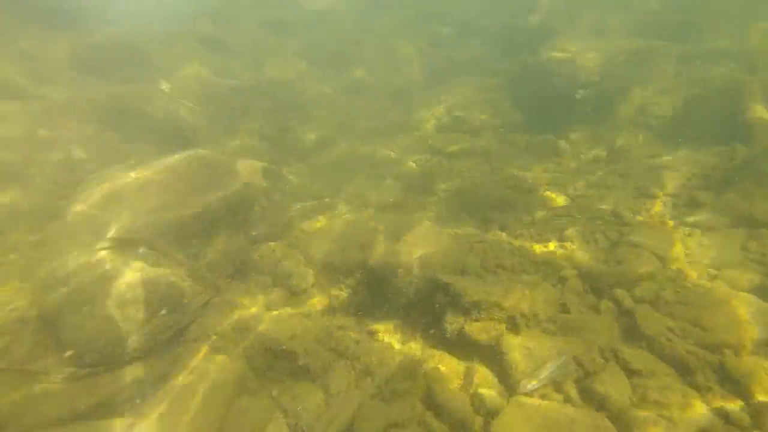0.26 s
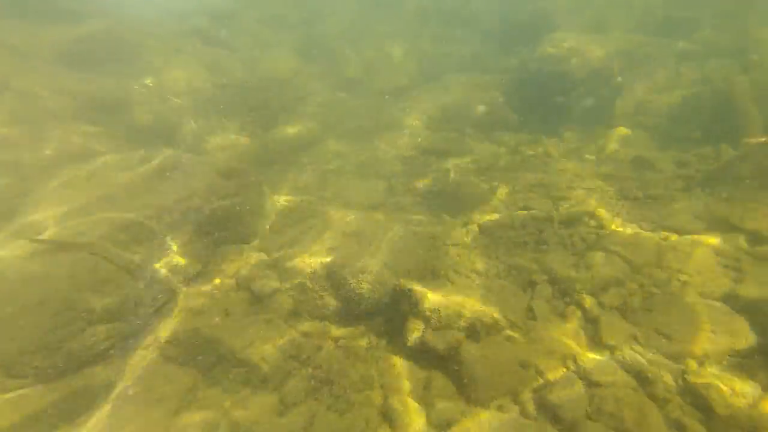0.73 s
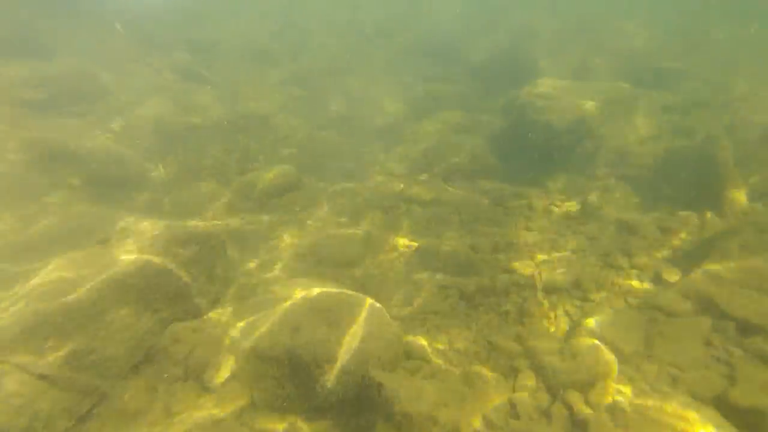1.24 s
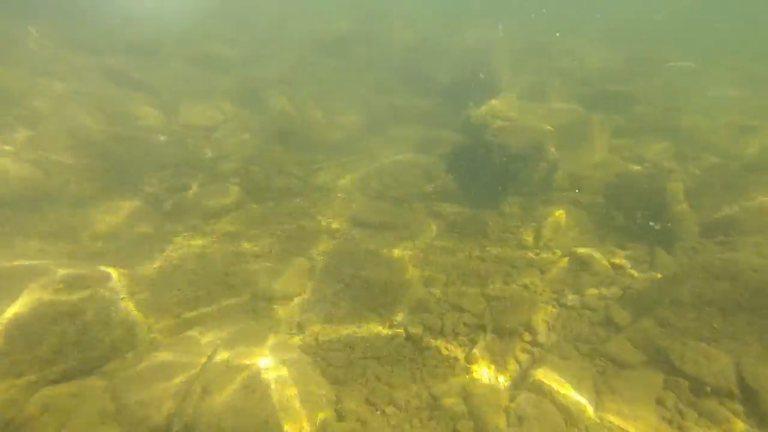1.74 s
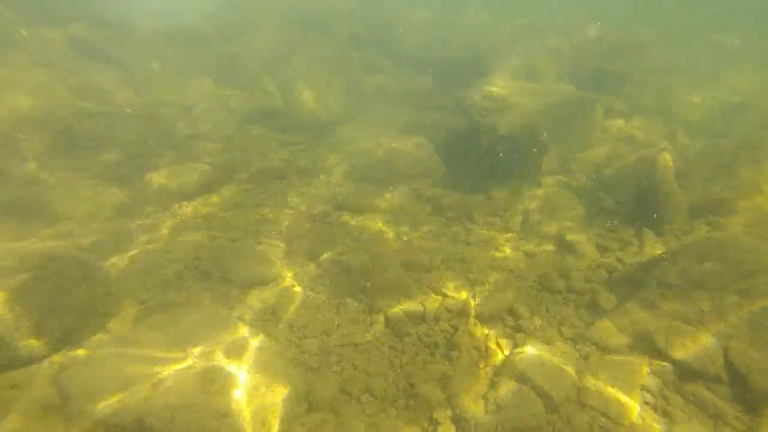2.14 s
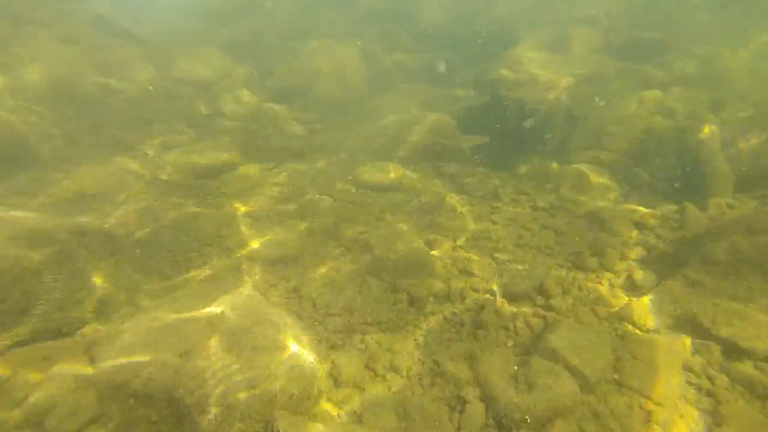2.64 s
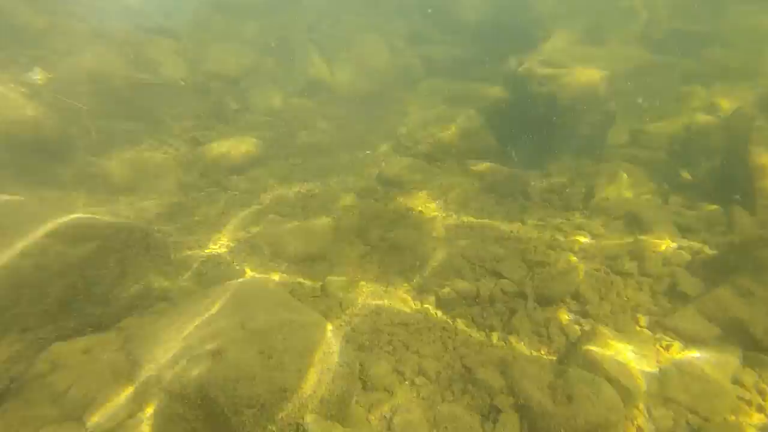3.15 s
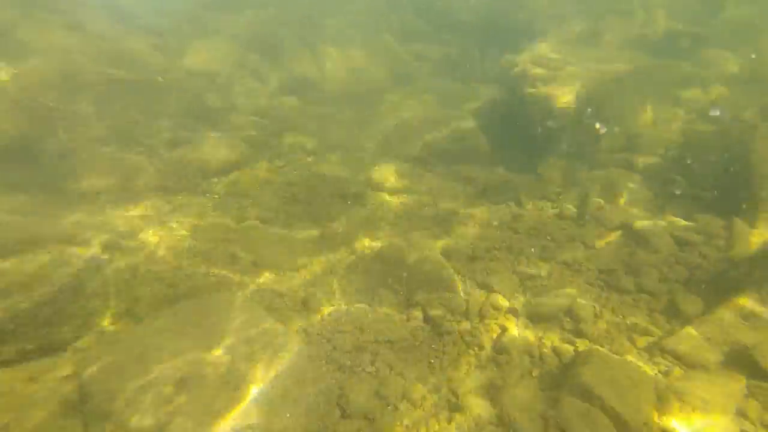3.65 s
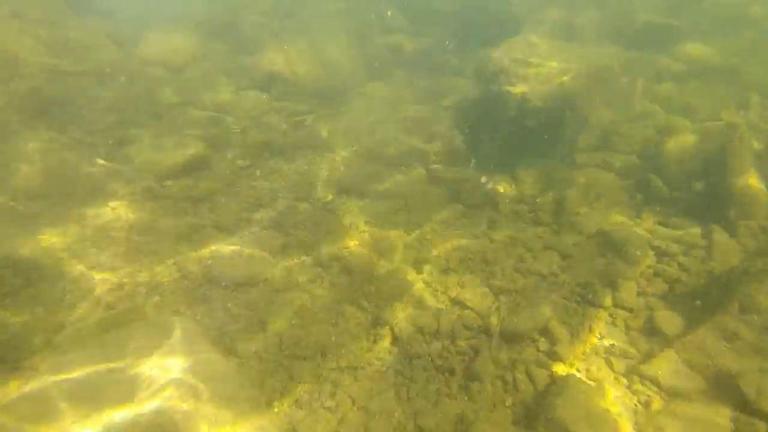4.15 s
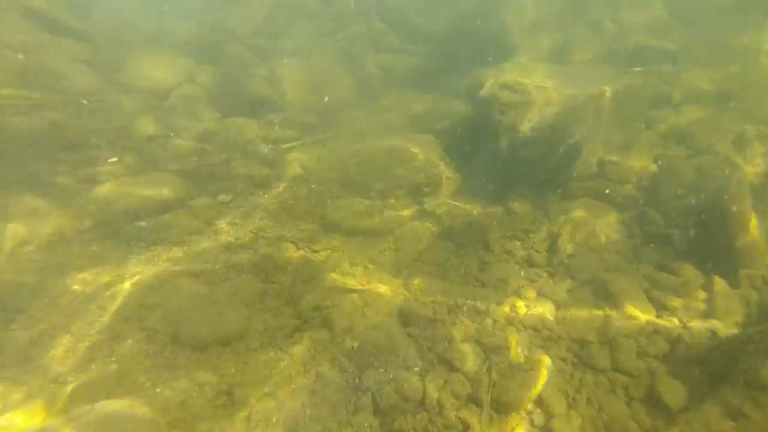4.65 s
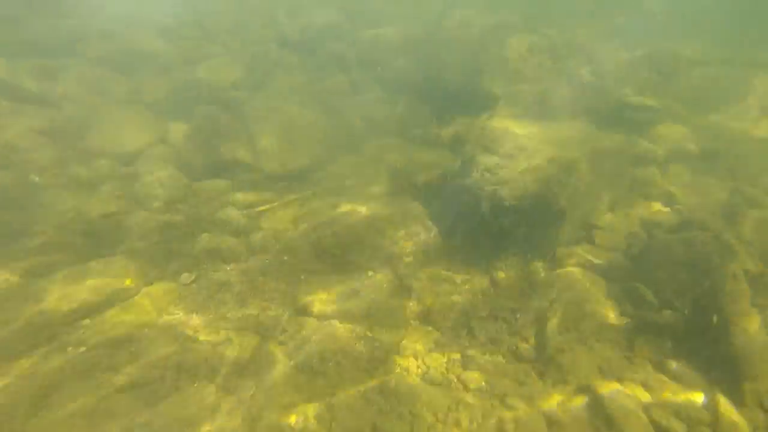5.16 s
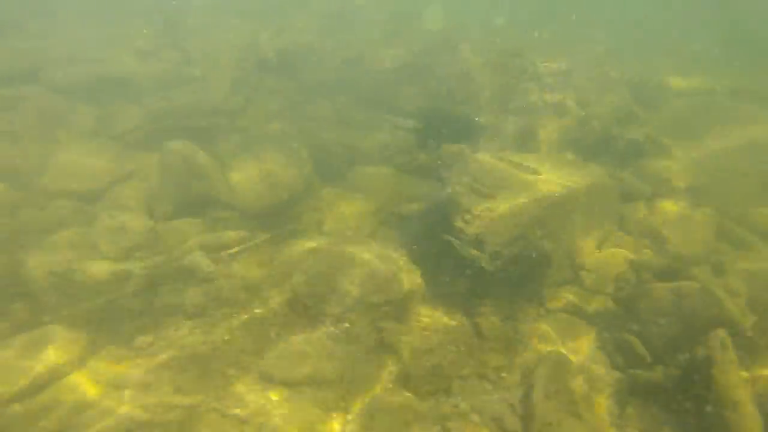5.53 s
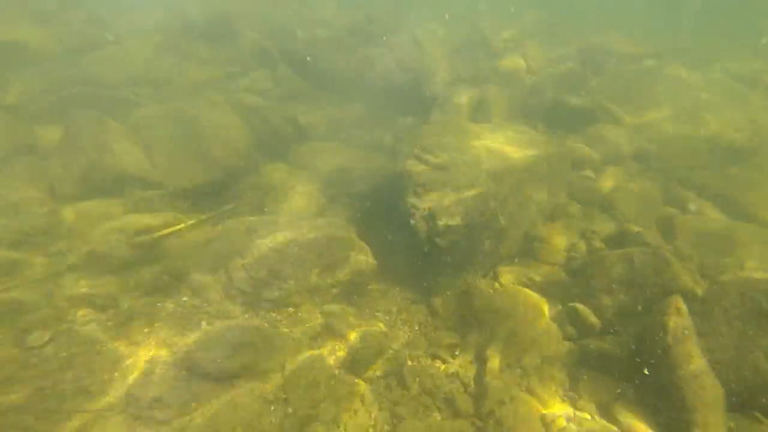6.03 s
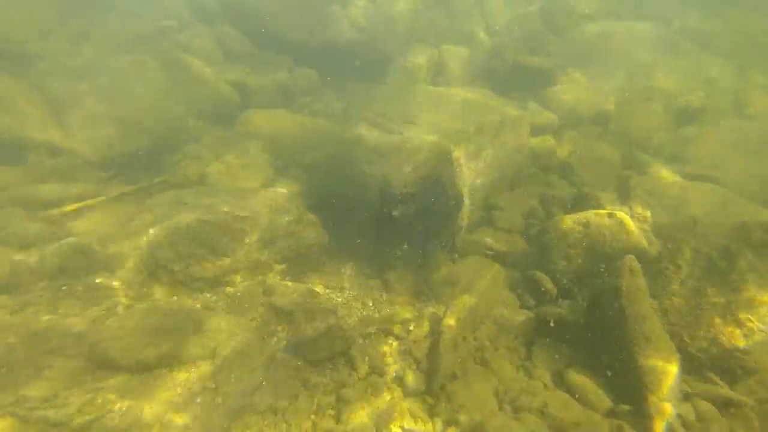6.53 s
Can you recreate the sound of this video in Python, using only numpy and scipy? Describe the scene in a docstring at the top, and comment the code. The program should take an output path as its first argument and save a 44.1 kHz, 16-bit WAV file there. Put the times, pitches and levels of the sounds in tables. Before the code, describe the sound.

Close underwater sound, bass-heavy and dull: eddies buffet a plastic casing, tiny bubbles fizz, weed and sand brush past nearer the left. Stones tap sparsely, then rattle and crack against the casing in a busy cluster. The current falls away, leaving a lone knock and faint juddering ticks, then several heavy bumps close together.

```python
"""On the stony bed of a shallow stream, two microphones inside a small watertight plastic shell pushed along it.
From the start eddies buffet the shell into a low rumble, with bubbles, weed and rubbing grit close against it;
bumps flex it and stones tick on it, one hard knock near 1.6 s, then a crowd of them from about 4 to 5.6 s.
The current falls back near 5.4 s, faint ticks judder past at 6.3 s, and a last surge brings heavy bumps at 6.5 s.
Noise shaped by spectra makes the water, damped modes the contact; left and right agree most in the bass."""
import sys
import numpy as np
from scipy import signal
from scipy.fft import rfft, irfft, next_fast_len
from scipy.io import wavfile
from scipy.ndimage import uniform_filter1d

SR = 44100
rng = np.random.default_rng(int(sys.argv[2]) if len(sys.argv) > 2 else 0)


def bounce(signal):
    """Save signal as a 16-bit WAV file at the path given by the first command-line argument."""
    frames = np.transpose(np.atleast_2d(signal))
    limited = np.clip(frames, -1, 1)
    pcm = np.round(limited * 32767).astype(np.int16)
    wavfile.write(sys.argv[1], SR, pcm)


N = 299439


def undb(db):
    """Amplitude of a level in dB."""
    return 10 ** (np.asarray(db) / 20)


def unit(x):
    """Scale to rms 1."""
    return x / np.sqrt(np.mean(x ** 2))


def smooth_twice(x, size):
    """Two running means along the last axis."""
    return uniform_filter1d(uniform_filter1d(x, size), size)


def walk(rate):
    """Random levels held for 1 / rate s, then smoothed twice; rms 1."""
    hold = int(SR / rate)
    steps = np.repeat(rng.standard_normal(N // hold + 1), hold)
    return unit(smooth_twice(steps, hold)[:N])


def left_right(pan_db):
    """Gains of the two microphones for a left minus right difference in dB."""
    return undb([[pan_db / 2], [-pan_db / 2]])


def pair(a, b, like):
    """Left and right of a given likeness (-1 opposed, 1 the same) from two unrelated signals."""
    like = np.clip(like, -1, 1)
    common = 1 + like + 1e-3
    difference = b * np.sqrt((1 - like) / common)
    return np.array([a + difference, a - difference]) * np.sqrt(common / 2)


def half_octave_share(octaves, step):
    """Amplitude share of one half-octave band, crossfading in power with its neighbours."""
    return np.clip(1 - np.abs(2 * octaves - step), 0, 1) ** .5


def eddies(spectrum, surge_db, flicker_db, rate):
    """Two unrelated noises of one colour; all half octaves share the surges and each flickers alone."""
    hz, db = np.transpose(spectrum)
    size = next_fast_len(N)
    f = np.arange(1, size // 2 + 2) * SR / size
    colour = undb(np.interp(np.log(f), np.log(hz), db, -150, -150))
    spectra = rfft(rng.standard_normal((2, size))) * colour
    out = 0
    for step in range(8, 22):
        band = irfft(spectra * half_octave_share(np.log2(f), step), size)[:, :N]
        out = out + undb(flicker_db * walk(rate)) * band
    return unit(undb(surge_db) * out)


HISS_DB = -89  # white noise before the low-pass


def hiss():
    """The microphones' own noise: unrelated left and right, darkened by a one-pole low-pass."""
    return undb(HISS_DB) * signal.lfilter([1], [1, -.8], rng.standard_normal((2, N)))


# colour of the buffeting: (frequency [Hz], relative level per Hz [dB])
RUMBLE_SPECTRUM = [(12, -46), (20, -25), (30, -26.5), (48, 1.5), (80, -6), (107, -1.5), (150, -1),
                   (193, -4), (296, -17), (344, -21), (400, -26), (520, -35.5), (880, -120)]
RUMBLE_SIDE_DB, RUMBLE_PAN_DB = -25, -0.64  # side against mid; left minus right


def rumble(db, surge):
    """Buffeting moves the shell as a whole, so both microphones hear nearly the same."""
    mid, side = eddies(RUMBLE_SPECTRUM, 1.67 * surge, 0.6, 22.0)
    both = mid + undb(RUMBLE_SIDE_DB) * side * np.array([[1], [-1]])
    return undb(db) * both * left_right(RUMBLE_PAN_DB)


# colour of the smaller eddies: (frequency [Hz], relative level per Hz [dB])
WASH_SPECTRUM = [(120, -39), (200, -22), (302, -15), (343, -15), (440, -8), (679, -21.5), (1200, -38),
                 (1560, -76.5), (2640, -120)]
# their strength along the way: (time [s], level [dB])
WASH_LEVEL_DB = [(0.0, -39), (0.47, -34.5), (1.04, -43), (1.55, -37.5), (1.89, -42), (2.189, -38.5),
                 (2.63, -38), (2.82, -40), (3.16, -40), (4.29, -38), (4.56, -40.5), (5.03, -37.5),
                 (5.39, -52), (5.6, -64), (5.8, -58.5), (6.31, -48.5), (6.5, -33.5), (6.79, -48)]
WASH_LIKE = -0.27  # likeness of left and right


def wash(surge):
    """Smaller eddies bend the walls, often in opposite sense at the two microphones."""
    db = np.interp(np.arange(N) / SR, *np.transpose(WASH_LEVEL_DB))
    return undb(db) * pair(*eddies(WASH_SPECTRUM, 2.4 * surge, 1.7, 19), WASH_LIKE)


BUBBLE_CYCLES, BUBBLE_GLIDE = 13, .003  # cycles to fall by e squared; glide scale per cycle


def bubble(hz, glide):
    """One bubble: a short decaying ring whose pitch rises."""
    turns = np.arange(int(3 * BUBBLE_CYCLES * SR / hz)) * hz / SR
    envelope = turns / (1 + turns) * np.exp(-2 * turns / BUBBLE_CYCLES)
    return envelope * np.sin(2 * np.pi * turns * (1 + BUBBLE_GLIDE * glide * turns))


BUBBLES_PER_S, BUBBLE_HZ = 1250, 2296  # mean rate, middle pitch
BUBBLE_OCTAVES, SWARM_OCTAVES = 0.28, .3  # pitch spread of single bubbles and of whole swarms
BUBBLE_DB = 1  # against the level handed in


def bubbles(db):
    """Tiny bubbles pinch off near the shell in swarms of like size, each a short rising ring."""
    out, chance = np.zeros((2, N + SR)), rng.random((14000, 3))
    normal = rng.standard_normal((14000, 2))
    times = np.cumsum(-np.log(chance[:, 0])) / BUBBLES_PER_S
    swarm = SWARM_OCTAVES * walk(30)
    for s, (_, size, glide), (pitch, side) in zip(times[times < N / SR], chance, normal):
        at = int(s * SR)
        hz = np.clip(BUBBLE_HZ * 2 ** (BUBBLE_OCTAVES * pitch + swarm[at]), 500, 9000)
        wave = bubble(hz, glide)
        # a few are far louder than the rest; higher ones are weaker
        level_db = -4.2 * np.log(size + 0.013) - 1.8 * np.log2(hz / BUBBLE_HZ)
        out[:, at:at + len(wave)] += undb(level_db) * left_right(4 + 8 * side) * wave
    return undb(db + BUBBLE_DB) * unit(out[:, :N])


BRUSH_PAN_DB = 10.5  # left minus right, for larger bubbles and brushes alike
# larger single bubbles: (time [s], peak level midway between left and right [dB], starting pitch [Hz])
BLIPS_HEARD = [(0.0598, -25.5, 2320), (0.2833, -39, 3300), (0.6156, -33, 2670), (0.8664, -41, 3200),
               (0.8857, -39, 2600), (0.9343, -43, 2250), (1.056, -47, 3000), (3.129, -34, 2340),
               (3.5857, -32.5, 2370), (3.6288, -30.5, 2090)]


def blips():
    """Larger bubbles, nearer the left microphone, stand out one by one as short rising rings."""
    out = np.zeros(N + SR)
    for s, db, hz in BLIPS_HEARD:
        wave = bubble(hz, 0.71)
        at = int(s * SR)
        out[at:at + len(wave)] += undb(db) * wave / wave.max()
    return left_right(BRUSH_PAN_DB) * out[:N]


# weed and sand sweeping past: (middle time [s], half length [s], centre before the treble tilt [Hz],
# spread [octaves], level before the swell, midway between left and right [dB])
BRUSH_SWELLS = [(0.19, 0.019, 2240, 0.75, -32), (0.265, 0.021, 1890, 0.39, -46.5),
                (0.339, 0.0068, 2270, 0.31, -42), (0.428, 0.0047, 2180, 0.45, -43),
                (0.476, 0.011, 1950, 0.6, -45), (0.595, 0.03, 2400, 0.25, -44.5),
                (0.76, 0.01, 6700, 0.15, -58), (0.908, 0.013, 1030, 0.14, -42.5),
                (0.967, 0.011, 4000, 0.53, -43.5), (1.006, 0.013, 2050, 0.71, -39.5),
                (1.133, 0.023, 6900, 0.19, -59.5), (1.232, 0.01, 6360, 0.13, -61),
                (1.425, 0.015, 8550, 0.16, -62.5), (1.507, 0.024, 6400, 0.085, -62),
                (1.801, 0.0047, 1650, 0.19, -29.5), (1.805, 0.021, 2220, 0.75, -41.5),
                (2.046, 0.021, 2270, 0.24, -52), (2.267, 0.04, 2380, 0.31, -49.5),
                (2.979, 0.0093, 1960, 0.42, -42), (3.075, 0.016, 2290, 0.51, -46.5),
                (3.193, 0.027, 2150, 0.69, -39), (3.684, 0.043, 1680, 0.33, -51),
                (3.758, 0.0078, 7500, 0.086, -57), (3.914, 0.01, 1710, .35, -46),
                (4.36, 0.052, 3510, 0.32, -49), (4.405, 0.0088, 1560, 0.19, -29),
                (5.156, 0.016, 2230, 0.73, -33.5), (5.356, 0.0088, 1530, 1.1, -42),
                (5.515, 0.0025, 4040, 0.68, -22), (5.896, 0.007, 1295, 0.77, -47),
                (6.204, 0.023, 2620, 0.16, -60), (6.515, 0.012, 2210, 0.41, -35.5),
                (6.621, 0.035, 1740, 0.49, -48.5)]


def brushes():
    """Weed and sand sweep past: each a ragged noise swell whose half octaves flutter apart."""
    lead = SR // 2  # room for swells that begin before the start
    out, t = np.zeros((2, N + SR)), np.arange(-SR // 8, SR // 8) / SR
    f = np.arange(1, len(t) // 2 + 2) * SR / len(t)
    for s, half, hz, octaves, db in BRUSH_SWELLS:
        away = np.log2(f / hz)
        colour = np.exp(-.5 * (away / octaves) ** 2) / f
        spectra = rfft(rng.standard_normal((2, len(t)))) * colour
        noise = 0
        for step in range(-4, 5):
            flutter = unit(smooth_twice(rng.standard_normal(len(t)), 200))
            noise = noise + undb(6.7 * flutter) * irfft(spectra * half_octave_share(away, step), len(t))
        envelope = np.exp(-.3 * np.abs(t / half) ** np.where(t < 0, 3.0, 2.5))
        swell = envelope * pair(*unit(noise), 1.0)
        at = int(s * SR) - SR // 8 + lead
        out[:, at:at + len(t)] += undb(db) * left_right(BRUSH_PAN_DB) * swell
    return out[:, lead:lead + N]


def ring(x, hz, t60):
    """One damped mode as a two-pole resonator; a unit impulse rings with peak about 1."""
    r, w = np.exp(-np.log(1000) / (t60 * SR)), 2 * np.pi * hz / SR
    return signal.lfilter([0, r * np.sin(w)], [1, -2 * r * np.cos(w), r * r], x)


def steep(x, hz):
    """A broad band-pass that keeps a mode from spilling far above and below its pitch."""
    edges = [hz / 1.423, min(hz * 1.3, 20000)]
    return signal.sosfilt(signal.butter(3, edges, "band", fs=SR, output="sos"), x)


def mode(strength, hz, t60, left_db, right_db, like, push=0):
    """Rough contact and a smooth push shake one shell mode; each microphone hears its share."""
    rough = strength * pair(*rng.standard_normal((2, *strength.shape)), like)
    left, right = ring(steep(rough, hz) + push, hz, t60)
    return np.array([undb(left_db) * left, undb(right_db) * right])


GRIT_PER_S, GRIT_SPREAD_DB = 490, -5  # mean grain rate; mean level of a grain against the largest
GRIT_BED_DB = 4  # steady bed against the rms of the grains


def grit_contact():
    """Strength of rubbing: a steady bed with sand grains of widely spread sizes on top."""
    falls = rng.random(N) < GRIT_PER_S / SR
    grains = falls * undb(GRIT_SPREAD_DB * rng.exponential(size=N))
    return unit(signal.lfilter([1], [1, -.93], grains)) + undb(GRIT_BED_DB)


# modes of the plastic shell: (frequency [Hz], decay by 60 dB [s], relative gain at left [dB],
# relative gain at right [dB], likeness of left and right [-1 to 1, clipped beyond; ticks use its sign])
SHELL_MODES = [(264, 0.017, -18.5, -18.5, 0.82), (428, 0.025, -10.5, -8, -0.5),
               (604, 0.023, -8.5, 6.5, -0.5), (767, 0.025, 5, 6.5, -0.45), (1000, 0.0023, 12, 4.5, -0.8),
               (1336, 0.009, 2.5, -6, -1.4), (1510, 0.029, -1, -15.5, -0.071), (1696, 0.013, 4, -23, -0.7),
               (2338, 0.0071, 7.5, -12, 0.85), (2470, 0.0022, 10.5, -13, 0.15), (2980, 0.0087, -6, 2, 0.76),
               (3500, 0.0036, -16.5, 8.5, 0.17), (3940, 0.014, -7.5, -17, 0.54),
               (5100, 0.0015, 1, -7.5, -0.098), (6070, 0.0018, -6.5, -4, -0.016),
               (8050, 0.0013, -0.5, -12, 0.43), (9600, 0.011, -14, -16, -1.1),
               (13500, .004, -28.5, -24, 0.1)]
# edges between the thud, ring, crack and snap modes: [Hz]
MODE_BAND_EDGES = [1140, 2000, 4600]


def grit(coarse_db, grit_db, fine_db):
    """Sand rubs against the shell and shakes its modes, each in its own patches."""
    contact, out = grit_contact(), 0
    rub_db = [coarse_db - 38.5, coarse_db - 31.5, grit_db - 30.5, fine_db - 11]
    for hz, t60, left_db, right_db, like in SHELL_MODES:
        band = np.searchsorted(MODE_BAND_EDGES, hz)
        patches = undb(rub_db[band] + 2.4 * walk(30))
        out = out + mode(contact * patches, hz, t60, left_db, right_db, like)
    return out


CONTACT_S, CRACK_HZ = [.0005, 0.0019, 0.00085, 0.00027], 2920  # time to blow's peak: thud, ring, crack, snap
BLOW_LIKE = 0.64  # size of the left-right likeness
PUSH_LAG_S = .0014  # the walls give way a moment after first contact
RATTLE_DB, RATTLE_S = -23.5, 0.0076  # against the blow's peak; decay time constant
# hard ticks on stone: (time [s], ring peak [dB], favoured pitch [Hz], thud over ring [dB],
# crack over ring [dB], treble snap over ring [dB], side of contact as left minus right [dB])
STONE_TICKS = [(0.0877, -27.5, 1190, 5.5, -8, -39, -5), (0.1640, -17, 1770, -3, -7, -24, 3),
               (0.1863, -26, 1430, -11, 10, -12, -1), (0.5664, -32.5, 1180, 4, -15, -27, -3),
               (0.9598, -35.5, 1820, 5, 5, 7.5, 0.5), (1.004, -27.5, 1680, -3, -15, -41, -2),
               (1.6113, -10, 1280, -0.5, -14, -23, -3), (1.643, -42.5, 1050, 4, -1, -29, -22),
               (1.761, -31.5, 1580, -12, -21, -36, 9), (1.774, -27, 1600, -14, -19, -33, 4),
               (2.498, -47.5, 1700, -16.5, 9.5, -31, 11), (2.822, -42.5, 1600, -12, -12, -2, 2),
               (3.0693, -24.5, 1730, -12, -5.5, -33, -3.5), (3.172, -30, 1300, 0, 2, -13.5, 2),
               (3.217, -32, 1500, 3.5, -0.5, -15, -9), (3.48, -46, 1500, -10, 8.5, -8, 4),
               (3.588, -31.5, 1290, -8, -8, -22.5, 14), (3.6585, -40, 1510, -14, 8.5, -20, 7),
               (3.9632, -20.5, 1300, -9, -9, -36.5, 2), (4.1122, -28.5, 1230, 6.5, -37.5, -36, 8),
               (4.15, -20, 1370, -5, -21.5, -24, 0.5), (4.165, -24, 1400, -17, -11, -39, 4),
               (4.177, -13, 1400, -13, -11, -55, 0.5), (4.2427, -49.5, 1380, -15, 23, -21, -18),
               (4.2767, -25.5, 1430, -9, -6, -41, -3), (4.309, -20, 1490, -23, -4.5, -47, -1),
               (4.321, -24, 1350, -20, -15, -40, -7), (4.3273, -24.5, 1540, -16.5, -13, -40, 1.5),
               (4.352, -35, 1400, -12, 4.5, -34, -6), (4.365, -28, 1550, -19, -19, -36, -2),
               (4.396, -22, 1800, -20, -7, -18, -3), (4.414, -29, 1700, -11, 0, -26, 1),
               (4.4498, -28, 1000, 0.5, -10.5, -17.5, -9), (4.462, -31, 1100, 7, -4, -33, -5),
               (4.602, -33, 1500, 6, -3, -31, 2), (4.637, -35.5, 1500, 2, -14, -31.5, -17),
               (4.6987, -36.5, 1500, -2, -7, -31, 3), (4.7272, -20.5, 1780, -32, -4.5, -44, -4),
               (4.789, -23, 1520, -1, -15, -16, -2), (4.854, -30.5, 1500, -10, 2, -17, 5),
               (4.881, -29, 1500, -8, -2, -12, 1), (4.8978, -29, 1380, -17, -7, -11.5, 6),
               (4.928, -14.5, 1560, -2, -22, -42, -4), (4.949, -18.5, 1490, -25, -33, -45, -1),
               (4.994, -27, 1500, -11, -7, -32, 5), (5.048, -45, 1500, -17, -13, -28, -1),
               (5.0786, -8, 1520, -32, -9, -39, -2.5), (5.1256, -18.5, 1570, -1, -11, -23, 1),
               (5.193, 5.5, 1500, -18, -15.5, -36, -12), (5.202, -30, 1550, -18, -15, -32, -1),
               (5.219, -32, 1070, -12, -12, -11, -2), (5.2247, -32.5, 1480, -5, 4, -8, -16.5),
               (5.263, -38.5, 1000, 5.5, -4, -21, -15), (5.2856, -32, 1060, -11, -4, -16, -16),
               (5.295, -31, 1200, 3, -11, -27, -3), (5.3139, -27, 1490, 0, -1, -13, -4),
               (5.323, -31, 1750, 2, -12, -25, -9), (5.361, -25, 1200, -3.5, -14, -29, -22),
               (5.370, -45.5, 1500, 7, 9, -14, -14), (5.38, -42.5, 1100, 19, -10, -25, -8),
               (5.413, -32, 1300, 9, -5, -16, -2), (5.4188, -10, 1040, 4, -5, -25, -7.5),
               (5.464, -45.5, 1430, -16, 2, -17, 10), (5.474, -38, 1500, -14, -4.5, -25, -2),
               (5.4883, -33.5, 1760, -21, 3, -4, 1), (5.5, -25, 1550, -18, -5, -20, -4),
               (5.5089, -18.5, 1500, -14, 1.5, -13, -2), (5.5138, -15, 1510, -12, 2, -1, 3.5),
               (5.527, -32, 1500, -13, -2, -7, -4), (5.5343, -6, 1180, 0.5, -10.5, -25, -5.5),
               (5.577, -43.5, 1300, 16, -14, -30, -3), (5.624, -37.5, 1580, 6.5, -23, -32, -3),
               (5.640, -47, 1200, 6, -6, -23, 3.5), (5.659, -52, 1030, 5, 4.5, -5, -17),
               (5.9086, -14, 1240, 10, -14, -39, -3.5), (6.4935, -32.5, 1490, -18, 8, -43, 12),
               (6.51, -18, 1400, 9, -18, -45, 11), (6.5264, -11.5, 1470, -8.5, -28, -39, -11),
               (6.545, -21.5, 1400, 14.5, -18, -50, -13.5), (6.6094, -37, 1460, 7, 2.5, -13, -1.5),
               (6.6506, -11, 1300, 4.5, -18.5, -34, -10.5)]
# one tick of the judder: the columns of STONE_TICKS after the time
JUDDER_TICK = (-46, 1334, 4, -7, -45, 12.5)
JUDDER_FROM_S, JUDDER_GAP_S, JUDDER_COUNT = 6.272, .0105, 9


def ticks():
    """Stones strike the shell: each blow swells and dies, rings the modes, and leaves grit rattling."""
    # juddering along a stone: evenly spaced faint ticks
    judder = [(JUDDER_FROM_S + k * JUDDER_GAP_S, *JUDDER_TICK) for k in range(JUDDER_COUNT)]
    columns = np.array([*STONE_TICKS, *judder]).T[..., None]
    s, ring_db, ring_hz, thud_db, crack_db, snap_db, pan_db = columns
    t = np.arange(SR // 14) / SR
    # loose grit rattles on in fits after the blow
    fits = uniform_filter1d(rng.standard_normal((len(s), len(t))), size=90) * np.sqrt(90)
    rattle = undb(RATTLE_DB + 12.0 * fits) * t / (t + 0.00054) * np.exp(-t / RATTLE_S)
    bands = np.zeros((4, 2, *rattle.shape))
    for hz, t60, left_db, right_db, like in SHELL_MODES:
        band = np.searchsorted(MODE_BAND_EDGES, hz)
        blow = (t / CONTACT_S[band]) ** 2 * np.exp(2 - 2 * t / CONTACT_S[band])
        rough, push = blow + rattle, 0
        # the low modes feel the blow as one smooth push, the high ones its rough grain
        if band == 0:
            slope = np.gradient(blow) * SR / (2 * np.pi * hz)
            senses = np.array([[[1]], [[np.sign(like)]]])
            rough, push = rattle, np.roll(slope, int(PUSH_LAG_S * SR)) * senses
        # ring and crack favour the modes nearest their pitch
        ring_favour_db = -60 * abs(np.log2(hz / ring_hz))
        crack_favour_db = -12 * abs(np.log2(hz / CRACK_HZ))
        favour_db = [0, ring_favour_db, crack_favour_db, 0][band]
        shaken = mode(rough, hz, t60, left_db, right_db, BLOW_LIKE * np.sign(like), push)
        bands[band] += undb(favour_db) * shaken
    peaks = np.sqrt(np.mean(bands ** 2, axis=1)).max(axis=-1, keepdims=True)
    band_db = ring_db + np.array([thud_db, 0 * s, crack_db, snap_db])
    sounds = np.sum((undb(band_db) / peaks)[:, None] * bands, axis=0)
    sounds = sounds * undb([pan_db / 2, -pan_db / 2])
    out = np.zeros((2, N + SR))
    for at, sound in zip((s[:, 0] * SR).astype(int), np.swapaxes(sounds, 0, 1)):
        out[:, at:at + len(t)] += sound
    return out[:, :N]


BUMP_RISE_S, BUMP_SAG_PER_S = 0.0028, 4.0  # time constant of the swell; rate at which pitch sags
BUMP_OVERTONE, BUMP_OVERTONE_DB, BUMP_OVERTONE_T60_S = 1.9, -17, 0.02  # pitch ratio, level, decay by 60 dB
# soft bumps that flex the whole shell, and the brief higher thud of the hard knock near 1.61 s: (time [s], peak
# level of the main tone midway between # left and right [dB], starting pitch [Hz], decay by 60 dB [s], left
# minus right [dB])
SHELL_BUMPS = [(0.176, -6.5, 140, 0.13, -2), (0.564, -6.5, 154.6, 0.14, 0.5),
               (0.986, -8.5, 124, 0.32, -1.5), (1.035, -13, 202, 0.15, 1), (1.269, -8, 111.7, 0.2, -2),
               (1.6102, 1, 121, 0.035, 1), (1.613, -23.5, 732, 0.048, 0), (2.622, -4.5, 163, 0.038, -0.5),
               (2.841, -9, 155, 0.076, 1), (2.946, -13, 168, 0.2, -0.5), (3.374, -19.5, 185, 0.1, 0),
               (3.423, -12.5, 130, 0.09, 2), (3.711, -8.5, 156, 0.051, 0), (3.949, -17, 165, 0.058, -1),
               (4.072, -11, 114.4, 0.44, -1), (4.283, -9, 147.5, 0.11, 0), (4.391, 0, 106.3, 0.084, -1.5),
               (4.497, -10.5, 180, 0.13, -1), (4.767, -1.5, 132, 0.063, 0.5),
               (4.898, -10.5, 102, 0.3, -1.5), (4.977, -16.5, 157, 0.067, -5), (5.079, -2, 138, 0.068, 1.5),
               (5.12, 2, 132.5, 0.06, 0.5), (5.16, -1.5, 129.7, 0.098, 0.5), (5.197, -3, 106.5, 0.14, -7.5),
               (5.321, -9, 133, 0.038, -13), (5.37, -14.5, 147.5, 0.19, -11), (5.4249, 0.5, 139, 0.045, 3),
               (5.5371, 0, 144, 0.087, 3.5), (5.9137, -0.5, 143.8, 0.058, 2.5), (6.424, -14, 100, 0.081, 6),
               (6.515, 4, 123, 0.05, -2), (6.55, -1, 165, 0.1, 1), (6.59, -5.5, 113.6, 0.18, 0.5),
               (6.636, 2, 117.5, 0.089, 2), (6.653, -4.5, 175, 0.1, 4.5)]


def bumps():
    """A soft push swells over its rise time and rings out, sagging in pitch, with a briefer overtone."""
    out, t = np.zeros((2, N + SR)), np.arange(SR // 4) / SR
    rise = (1 - np.exp(-t / BUMP_RISE_S)) ** 2
    sagging = np.log1p(BUMP_SAG_PER_S * t) / BUMP_SAG_PER_S  # time stretched as the pitch falls
    over_decay = undb(BUMP_OVERTONE_DB - 60 * t / BUMP_OVERTONE_T60_S)
    for s, db, hz, t60, pan_db in SHELL_BUMPS:
        shape = rise * np.exp(-np.log(1000) * t / t60)
        peak = shape.max()
        phase = 2 * np.pi * hz * sagging
        main = shape / peak * np.sin(phase)
        overtone = over_decay * rise / peak ** 2 * np.sin(BUMP_OVERTONE * phase)
        at = int(s * SR)
        out[:, at:at + len(t)] += undb(db) * left_right(pan_db) * (main + overtone)
    return out[:, :N]


# current on the shell: (time [s], buffeting level [dB], coarse rubbing drive [dB],
# rubbing drive and bubble level [dB], treble rubbing drive [dB]); grit() offsets the drives
CURRENT = [(0.0, -14.5, -56, -46.5, -67), (0.4, -18, -47, -56.5, -72.5), (0.74, -19.5, -59, -59, -68),
           (1.04, -21, -62, -54.5, -63.5), (1.51, -19.5, -61.5, -52, -73), (1.72, -22, -58, -60.5, -73.5),
           (2.78, -18.5, -42.5, -54.5, -72), (3.04, -18, -47.5, -48.5, -71), (3.25, -19, -62, -61, -69.5),
           (3.44, -16, -61, -57, -73), (3.74, -20.5, -56.5, -51, -68), (4.03, -14.5, -51, -52.5, -73),
           (4.27, -16, -35.5, -47.5, -68.5), (4.6, -18, -55, -54, -68.5), (5.07, -17, -41.5, -46, -62.5),
           (5.24, -19, -57.5, -56, -69.5), (5.37, -26, -55, -51, -75), (5.41, -32.5, -52, -63, -80.5),
           (5.52, -27, -49, -60, -77), (5.65, -37, -63, -76.5, -86.5), (6.22, -29.5, -59, -67.5, -82),
           (6.49, -17, -43, -54, -71), (6.79, -28.5, -60, -65.5, -81.5)]


def scene():
    """The stream from inside the shell: hiss, current, bubbles, brushes, grit, ticks and bumps."""
    s, *columns = np.transpose(CURRENT)
    rumble_db, coarse_db, grit_db, fine_db = (np.interp(np.arange(N) / SR, s, c) for c in columns)
    surge = walk(24)  # shared by rumble and wash
    water = rumble(rumble_db, surge) + wash(surge)
    # sand and bubbles arrive in short clumps
    clumps = undb(2.5 * walk(55))
    rustle = clumps * (bubbles(grit_db) + grit(coarse_db, grit_db, fine_db)) + blips() + brushes()
    return hiss() + water + rustle + ticks() + bumps()


TOP_HZ = 16000


def record(dry):
    """The loudest peaks are rounded off at full scale, then the treble is cut steeply above TOP_HZ."""
    rounded = dry / (1 + np.abs(dry) ** 12) ** (1 / 12)
    return signal.sosfilt(signal.ellip(8, .2, 70, TOP_HZ, fs=SR, output="sos"), rounded)


dry = scene()
out = record(dry)
bounce(out)
```